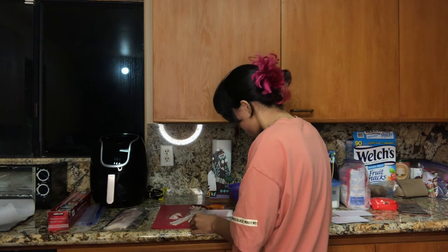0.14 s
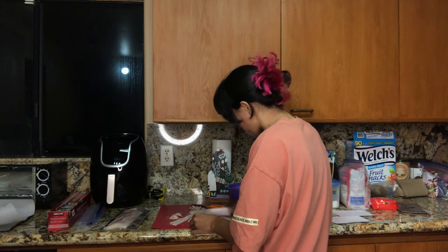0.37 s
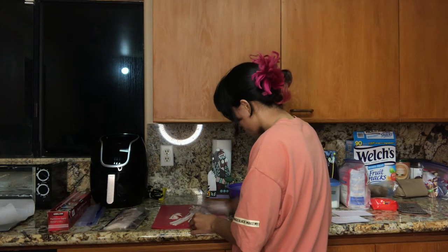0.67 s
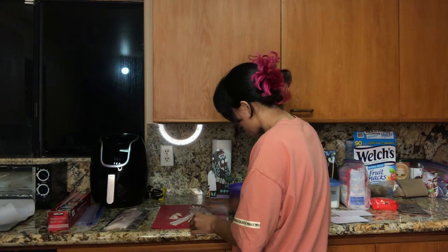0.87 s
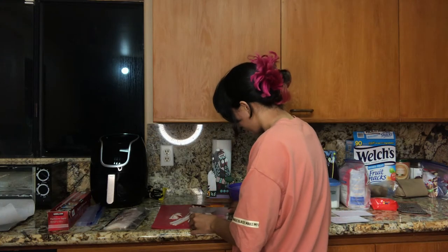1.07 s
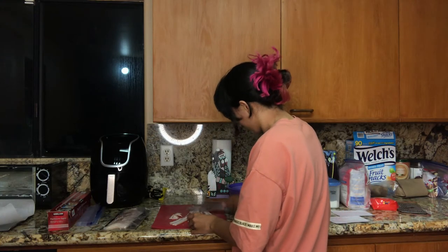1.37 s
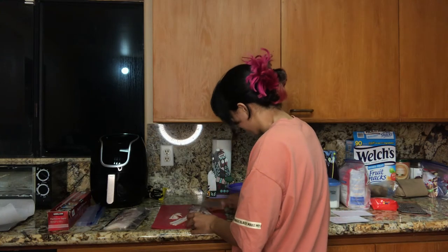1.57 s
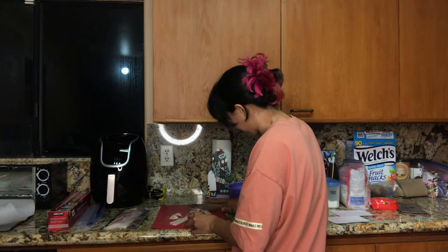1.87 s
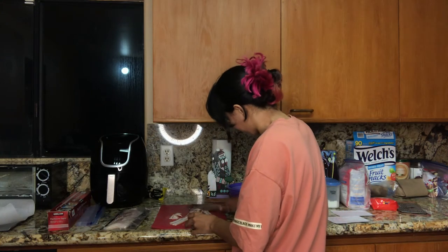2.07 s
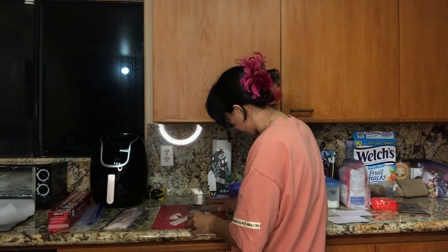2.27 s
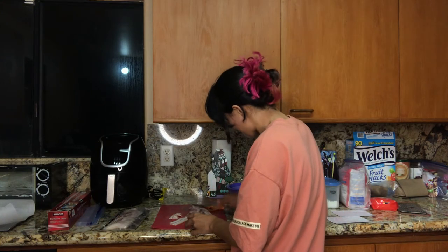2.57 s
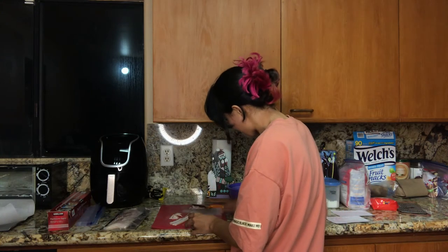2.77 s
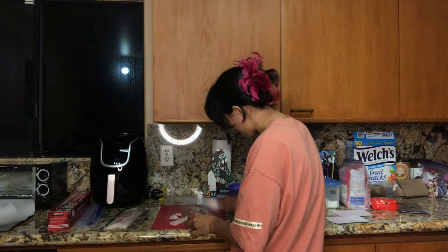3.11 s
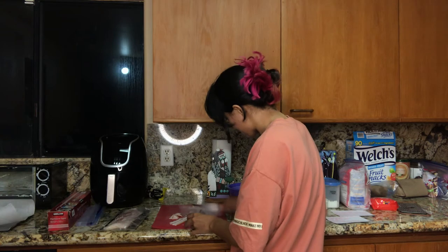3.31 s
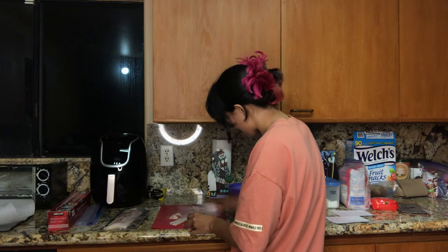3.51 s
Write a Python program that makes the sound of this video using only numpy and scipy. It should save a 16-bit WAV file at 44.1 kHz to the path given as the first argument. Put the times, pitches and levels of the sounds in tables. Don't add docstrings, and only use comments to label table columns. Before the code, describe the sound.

A knife chops raw meat about five times a second on a thin plastic mat, with sharp ticks, counter thumps and mat slaps; strokes briefly soften midway, then resume. Hard home kitchen, microphone at arm's length.

```python
import sys
import numpy as np
from scipy import signal
from scipy.fft import rfft, irfft
from scipy.io import wavfile

SR = 44100
rng = np.random.default_rng(int(sys.argv[2]) if len(sys.argv) > 2 else 0)


def volts_from_decibels(level):
    exponent = np.asarray(level, float) / 20
    return 10 ** exponent


def unload_audio(sound):
    columns = np.transpose(np.atleast_2d(sound))
    steps = np.round(np.clip(columns, -1, 1) * 32767)
    wavfile.write(sys.argv[1], SR, steps.astype(np.int16))


N = 160965


def read(points, hz):
    f, value = np.transpose(points)
    return np.interp(np.log(hz + 1), np.log(f + 1), value)


def unit(x):
    return x / np.max(abs(x))


def add(mix, s, sound):
    part = mix[round((s + 1) * SR):][:len(sound)]
    part += sound[:len(part)]


def click(db):
    log_size = np.log(volts_from_decibels(np.concatenate([db, db[-2:0:-1]])))
    spectrum = np.exp(np.conj(signal.hilbert(log_size)))
    return np.fft.ifft(spectrum).real[:2048]


def ring(x, modes):
    out = np.zeros(len(x))
    for k, (hz, width_hz, db) in enumerate(modes):
        r = np.exp(-np.pi * width_hz / SR)
        angle = 2 * np.pi * hz / SR
        mode = signal.lfilter([np.sin(angle)], [1, -2 * r * np.cos(angle), r * r], x)
        out += (-1) ** k * volts_from_decibels(db) * mode
    return out


def tick(bright_db, ping_hz):
    # (frequency [Hz], level [dB])
    edge_spectrum = [(150, -24), (700, -8.5), (1600, -4.5), (2500, 0), (4300, 0), (6900, -6), (13700, -7),
                     (16000, -18.5)]
    chatter_s, chatter_db, chatter_per_s = 0.008, -3.5, 2500
    ping_width_hz, ping_db = 590, -31.5
    hz = np.fft.rfftfreq(4096, 1 / SR)
    contact = click(read(edge_spectrum, hz) + bright_db * np.log2(hz / 4000 + 0.15))
    contact = unit(contact + ring(contact, [(ping_hz, ping_width_hz, ping_db)]))

    t = np.arange(600) / SR
    draw = rng.random((600, 2))
    hits = (draw[:, 0] < chatter_per_s / SR) * (2 * draw[:, 1] - 1)
    swell = np.exp(-abs(t - 0.0013) / chatter_s) * np.minimum(t / 0.0015, 1)
    landing = np.arange(600) == 55
    return np.convolve(landing, contact), np.convolve(volts_from_decibels(chatter_db) * hits * swell, contact)


def thump():
    # (frequency [Hz], width [Hz], level [dB])
    counter_modes = [(97, 14.6, -6), (128, 56, -25), (223, 11, -6), (249.8, 20, 6.5), (277, 90, -19),
                     (418, 40, -3.5)]
    push_ms, press_lead_s, press_db = 0.9, 0.01027, -12.5
    t = np.arange(-900, 9000) / SR
    u = t * 1000 / push_ms
    v = (t + press_lead_s) * 1000 / push_ms
    weight = u * np.exp((1 - u ** 2) / 2)
    press = v * np.exp((1 - v ** 2) / 2)
    push = weight + volts_from_decibels(press_db) * press
    return push + volts_from_decibels(-53) * ring(push, counter_modes)


def slap():
    # (frequency [Hz], level [dB])
    slap_spectrum = [(120, -21.5), (480, 1.5), (950, -7), (1350, -5), (1700, -11), (3000, -18.5),
                     (6000, -22), (15000, -62)]
    # (frequency [Hz], width [Hz], level [dB])
    mat_modes = [(507.3, 63, -3), (553.5, 28.3, -4), (670.5, 39.7, 1), (750, 41, 2.5), (866.6, 16, -7),
                 (904, 24, -1), (982.7, 32, 3), (1038, 19, -5.5), (1217.6, 38, -2), (1271, 24, -7.5),
                 (1408, 29, -33.5)]
    flutter_s, flutter_db = 0.0088, -12.5
    landing = np.pad(click(read(slap_spectrum, np.fft.rfftfreq(4096, 1 / SR))), (0, 7000))
    landing = -unit(landing + volts_from_decibels(-36.5) * ring(landing, mat_modes))

    t = np.arange(1500) / SR
    draw = rng.standard_normal((len(t), 2))
    flutter = volts_from_decibels(flutter_db) * (draw[:, 0] > 1.3) * draw[:, 1] * np.exp(-t / flutter_s)
    return landing, np.convolve(flutter, landing[:2048])


def sticky():
    crackle = np.diff(rng.standard_normal(202) ** 3, 2)
    return unit(crackle * np.hanning(200))


def echoes(x):
    # (delay [ms], level [dB])
    reflections = [(1.7, -3.5), (3.6, 4), (6.2, -15), (10.5, -17), (13.5, 0.5), (17.2, -16.5), (21.2, -5),
                   (27.5, -24)]
    dull_hz = 5200
    taps = np.zeros(2000)
    for ms, db in reflections:
        taps[round(ms * SR / 1000)] = volts_from_decibels(db)
    r = np.exp(-2 * np.pi * dull_hz / SR)
    return signal.lfilter([1 - r], [1, -r], signal.oaconvolve(x, taps)[:len(x)])


def tail(x):
    # (frequency [Hz], time to fall 60 dB [s])
    decay_times = [(80, 0.62), (210, 0.29), (560, 0.43), (1470, 0.43), (3880, 0.4), (10200, 0.33),
                   (16000, 0.21)]
    rise_s, early_s, early_db = 0.0066, 0.0054, 7
    hz, t, z = signal.stft(rng.standard_normal(SR), SR, nperseg=512)
    fall = volts_from_decibels(-60 * t / read(decay_times, hz)[:, None])
    h = signal.istft(z * fall, SR, nperseg=512)[1]
    t = np.arange(len(h)) / SR
    h = h * (1 - np.exp(-t / rise_s)) * volts_from_decibels(early_db * np.exp(-t / early_s))
    return signal.fftconvolve(x, h / np.linalg.norm(h))[:len(x)]


def rumble():
    # (frequency [Hz], level [dB per Hz])
    rumble_spectrum = [(20, -35), (45, -0.5), (95, -6), (250, -5.5), (500, -11.5), (1200, -18.5),
                       (2000, -26.5), (14000, -41)]
    shape = volts_from_decibels(read(rumble_spectrum, np.fft.rfftfreq(N, 1 / SR)))
    x = irfft(rfft(rng.standard_normal(N)) * shape, N)
    return volts_from_decibels(-50.5) * x / np.std(x)


def scene():
    # (time [s], edge tick [dB], thump [dB], tick brightness [dB per octave], blade ping [Hz])
    strokes = [(0.1048, -19, -34.5, 1.2, 3000), (0.2977, -17, -34, -1.2, 1870),
               (0.4787, -14, -31, -1.9, 3750), (0.6704, -15.5, -32.5, 1.2, 4000),
               (0.8644, -17.5, -31.5, 0.5, 1930), (1.046, -13, -30, 0, 2030), (1.26, -19.5, -29, 0.7, 1810),
               (1.4524, -19.5, -29, 0, 1830), (1.6517, -30, -31.5, 3, 1720), (1.8186, -38, -39, 2, 1690),
               (1.8412, -30.5, -33.5, 3, 1720), (2.0007, -33.5, -43, 0.8, 2680),
               (2.2034, -22, -33, -0.3, 3580), (2.397, -21, -34, -1.1, 3250),
               (2.5854, -18, -33.5, -0.6, 4450), (2.759, -18, -32, -1.6, 1950),
               (2.9342, -14.5, -33.5, -1, 1940), (3.117, -16, -30.5, 0.5, 2470),
               (3.309, -17.5, -36, 1.8, 3280), (3.5033, -18.5, -32.5, -0.2, 2560)]
    earlier_stroke = (-0.03, -20, -39, -2, 2950)
    # (time [s], level [dB])
    mat_slaps = [(0.122, -22.5), (0.315, -30.5), (0.494, -21), (0.688, -18.5), (0.885, -20), (1.056, -11.5),
                 (1.274, -10.5), (1.469, -14.5), (1.656, -20.5), (1.846, -22.5), (2.224, -29.5),
                 (2.405, -33), (2.602, -35.5), (2.771, -29), (2.947, -29.5), (3.132, -25), (3.326, -39),
                 (3.516, -32)]
    earlier_slap = (-0.055, -30.5)
    # (time [s], level [dB])
    crackles = [
        (1.918, -44),
        (2.013, -43),
        (2.087, -47),
        (2.096, -48),
        (2.111, -42),
    ]
    tick_db, thump_db, slap_db = 4.12, 10, 1
    thump_lag_s, slap_lead_s = 0.01981, 0.00102
    ticks, thumps, slaps = np.zeros((3, 3, N + SR))
    close = np.zeros(N + SR)

    for k, (s, edge_db, weight_db, bright_db, ping_hz) in enumerate([earlier_stroke] + list(strokes)):
        landing, chatter = tick(bright_db, ping_hz)
        add(ticks[k % 3], s, volts_from_decibels(edge_db + tick_db) * landing)
        add(close, s, volts_from_decibels(edge_db + tick_db) * chatter)
        add(thumps[k % 3], s + thump_lag_s - 900 / SR, volts_from_decibels(weight_db + thump_db) * thump())
    for k, (s, db) in enumerate([earlier_slap] + list(mat_slaps)):
        landing, flutter = slap()
        add(slaps[k % 3], s - slap_lead_s, volts_from_decibels(db + slap_db) * landing)
        add(close, s - slap_lead_s, volts_from_decibels(db + slap_db) * flutter)
    for s, db in crackles:
        add(close, s - 0.002, volts_from_decibels(db) * sticky())

    into_room = ticks + volts_from_decibels(-5) * thumps + slaps
    room = volts_from_decibels(5) * sum(tail(row) for row in into_room)
    near = echoes((volts_from_decibels(-3.5) * ticks + slaps).sum(0))
    mix = (ticks + thumps + slaps).sum(0) + close + near + room
    return (mix[SR:] + rumble())[None]


def top_cut(x):
    return signal.sosfilt(signal.butter(12, 16990, fs=SR, output="sos"), x)


def record(dry):
    # (frequency [Hz], width [Hz], depth [dB])
    notches = [(437, 15, -17.5), (4920, 350, -5), (10400, 310, -7)]
    low_cut_hz, band_edge_hz = 43.7, 17800
    hz = np.fft.rfftfreq(8192, 1 / SR)
    db = sum(depth / (1 + (2 * (hz - f) / width_hz) ** 2) for f, width_hz, depth in notches)
    db = db - np.clip((hz - band_edge_hz) / 8, 0, 31)
    cut = signal.lfilter(*signal.butter(2, low_cut_hz, "high", fs=SR), dry)
    heard = signal.oaconvolve(cut, click(db)[None], axes=1)[:, :N]
    return top_cut(heard)


dry = scene()
out = record(dry)
unload_audio(out)
```